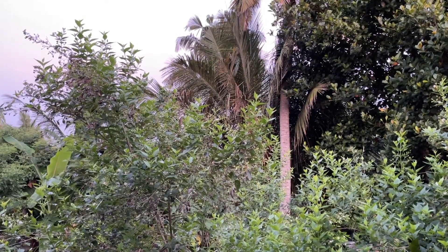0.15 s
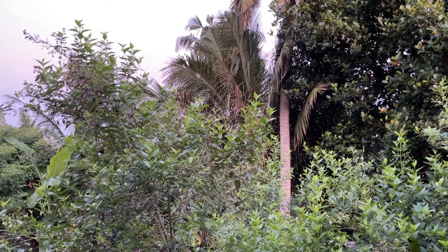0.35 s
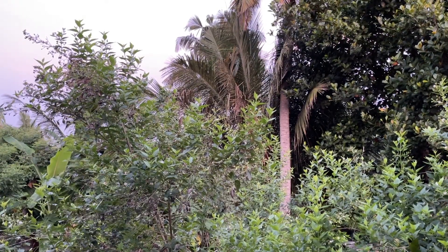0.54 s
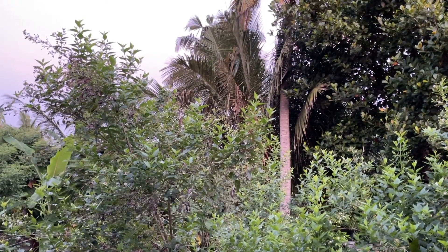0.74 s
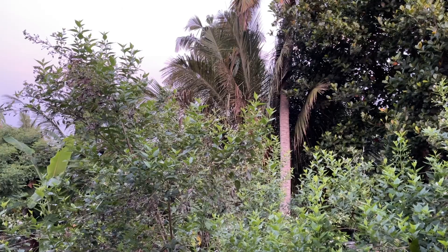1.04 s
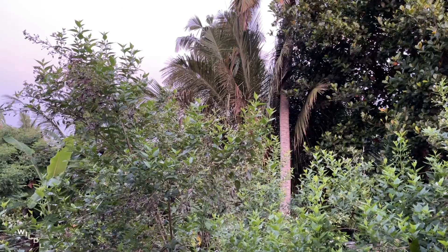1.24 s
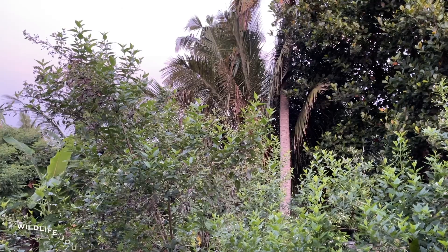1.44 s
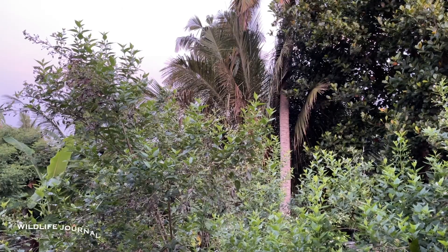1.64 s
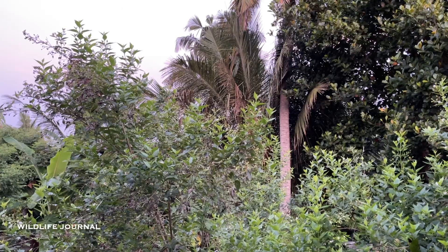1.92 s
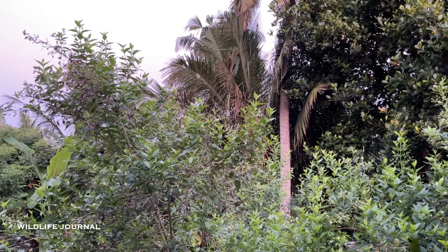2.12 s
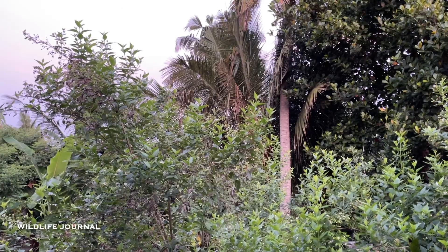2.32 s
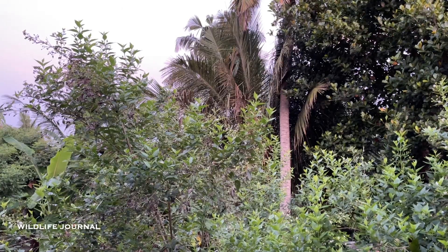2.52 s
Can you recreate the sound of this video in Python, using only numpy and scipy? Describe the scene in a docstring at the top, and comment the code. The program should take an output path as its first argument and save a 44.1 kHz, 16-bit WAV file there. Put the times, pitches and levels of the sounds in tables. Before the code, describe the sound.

Two strong, clear bird whistles rise, then drop with a little rasp, each trailing a long diffuse echo. High thin cicadas, a far insect chorus and soft air rumble continue throughout a leafy garden, heard in wide stereo.

```python
"""A large bird whistles its rising-and-falling call twice among garden trees: a swept sine with overtones and rasp,
convolved with scattered, decaying reflections that form a long echo.
A near cicada buzzes high up beside a fainter one: click-driven narrow-band tones, with a low hum at the click rate.
Behind them lie a far insect chorus, crickets and the rumble of the air, all shaped noise,
and a few far birds, which are short frayed sine notes."""
import sys
import numpy as np
from scipy import signal
from scipy.fft import rfft, irfft, next_fast_len
from scipy.io import wavfile
from scipy.ndimage import uniform_filter1d

SR = 44100
rng = np.random.default_rng(int(sys.argv[2]) if len(sys.argv) > 2 else 0)


def store_wav(level_fs):
    """Save 16-bit WAV to argv[1]."""
    pcm = np.round(np.clip(np.atleast_2d(level_fs), -1, 1) * 32767)
    wavfile.write(sys.argv[1], SR, pcm.T.astype(np.int16))


def gain_from_decibels(decibels):
    """Convert decibel values to linear amplitude factors."""
    exponent = np.asarray(decibels, float) / 20
    return 10 ** exponent


N = 117747  # samples in the scene
LEAD = 11025  # samples computed ahead of time zero, where the first call begins


def evened(x):
    """Normalization: scales a signal to an rms of 1."""
    return x / np.sqrt(np.mean(x ** 2) + 1e-20)


def read(points, hz, column=1):
    """Interpolation of a table column along a logarithmic frequency axis."""
    table = np.transpose(points)
    return np.interp(np.log(hz + 1), np.log(table[0] + 1), table[column])


def coloured(x, spectrum):
    """Linear filtering: weights each frequency by a table of gains in dB."""
    hz = np.fft.rfftfreq(len(x), 1 / SR)
    return irfft(rfft(x) * gain_from_decibels(read(spectrum, hz)), len(x))


def drift(rate_hz, size):
    """Superposition of slow sines in random phase gives an irregular fluctuation of rms 1."""
    t = np.arange(size) / SR
    return evened(sum(np.sin(2 * np.pi * (f * t + rng.random())) / np.sqrt(f)
                      for f in np.geomspace(rate_hz / 10, rate_hz, num=20)))


def ports(pair, table):
    """Interaural-style cues: phase and level differ between left and right, frequency by frequency."""
    size = next_fast_len(pair.shape[1] + 2048)
    hz = np.fft.rfftfreq(size, 1 / SR)
    half = gain_from_decibels(read(table, hz, column=2) / 2) * np.exp(.5j * read(table, hz))
    return irfft(rfft(pair, size) * [half, 1 / half], size)[:, :pair.shape[1]]


def wash(spectrum, table, level_db, patchy_db, swell_db, swell_hz):
    """Many unresolved sources sum to Gaussian noise: random short-time spectra, patchy and swelling."""
    frames, hz = N // 256 + 5, np.fft.rfftfreq(1024, 1 / SR)
    a, b, c, d, patches = rng.standard_normal((frames, 513, 5)).T
    patches = uniform_filter1d(patches, size=8, axis=0)  # smooth along frequency
    patches = evened(uniform_filter1d(patches, size=12, axis=1))  # smooth along time
    swell = drift(swell_hz, frames * 256)[::256]
    # the right channel is a partly coherent copy of the left
    alike = np.clip(read(table, hz), 0, 1)[:, None]
    left = a + 1j * b
    right = alike * left + np.sqrt(1 - alike ** 2) * (c + 1j * d)
    half = (gain_from_decibels(read(table, hz, column=3) / 2) * np.exp(.5j * read(table, hz, column=2)))[:, None]
    z = np.array([left * half, right / half])
    z *= gain_from_decibels(read(spectrum, hz)[:, None] + patchy_db * patches + swell_db * swell)
    out = signal.istft(z, nperseg=1024, noverlap=768)[1][:, :N]
    return gain_from_decibels(level_db) * out / np.sqrt(np.mean(out.mean(0) ** 2))


def air():
    """Broadband noise whose spectral density falls steeply above the bass is heard as rumble."""
    # Rumble spectrum. Each row: frequency in Hz, relative density in dB.
    air_spectrum = [(30, -2.5), (60, -4), (110, 3), (200, -4.5), (330, -8.5), (600, -13.5), (1200, -23),
                    (2400, -36.5), (5000, -46), (6000, -56), (8000, -120)]
    # Stereo field. Each row: frequency in Hz, likeness of the channels (0 to 1), phase in radians,
    # left over right in dB.
    air_ports = [(39.6, .995, 0.36, 3), (85, 1, 0.28, 2.5), (220, 0.86, -1.07, -1), (450, 0.31, -1.09, 4.5),
                 (1580, 0.11, -0.7, 0.5), (2350, 0.4, -0.067, 2), (4600, 0.092, 0.69, -2)]
    return wash(air_spectrum, air_ports, level_db=-54, patchy_db=0.72, swell_db=0.26, swell_hz=3.0)


def crickets():
    """Superposed chirring in a narrow band becomes band noise with a quick common swell."""
    # Cricket band. Each row: frequency in Hz, relative density in dB.
    cricket_spectrum = [(2000, -85), (2500, -12.5), (2750, -4), (2900, 4), (3100, -9.5), (3500, -50)]
    # Stereo field. Each row: frequency in Hz, likeness of the channels (0 to 1), phase in radians,
    # left over right in dB.
    cricket_ports = [(2670, 0.62, 0.87, -7), (3200, 0.36, 0.33, 10.5)]
    return wash(cricket_spectrum, cricket_ports, level_db=-78.5, patchy_db=1, swell_db=2, swell_hz=10)


def insect_chorus():
    """Far insects in several treble bands overlap into one noise-like chorus."""
    # Chorus bands. Each row: frequency in Hz, relative density in dB.
    chorus_spectrum = [(4400, -75), (5200, -38.5), (5700, -10.5), (6100, -4.5), (6500, -8), (6800, -10.5),
                       (7200, -38.5), (7900, -17), (8400, -11.5), (9000, 0), (9900, -14), (10300, -44),
                       (12000, -120)]
    # Stereo field. Each row: frequency in Hz, likeness of the channels (0 to 1), phase in radians,
    # left over right in dB.
    chorus_ports = [(5520, 0.13, 3, -0.5), (6656, 0.4, -0.5, 8.5), (7280, 0.44, -12, -18.5),
                    (8850, 1, -16, 2.5), (8690, 0.44, -0.06, 9), (10800, 0.58, -1, 4.5)]
    return wash(chorus_spectrum, chorus_ports, level_db=-62.5, patchy_db=1.3, swell_db=-0.14, swell_hz=3.7)


def far_birds():
    """Amplitude modulation by noise frays gliding, soft-edged tones on their long way through the leaves."""
    # Short notes. Each row: start in seconds, length in seconds, pitch in Hz, glide over the note in Hz,
    # level at mid-note in dB, fraying share.
    far_notes = [(1.075, .045, 1000, 20, -65, .2), (1.44, .04, 830, -10, -64, .2),
                 (1.425, .055, 4100, -200, -82, 1.5), (1.6, .04, 1045, 10, -67, .2),
                 (2.025, .07, 890, -30, -68, .2)]
    t, out = np.arange(N) / SR, 0
    for start, length, hz, glide_hz, db, fray in far_notes:
        u = np.clip((t - start) / length, 0, 1)  # progress through the note
        shake = 1 + fray * evened(uniform_filter1d(rng.standard_normal(N), size=120))
        tone = np.sin(2 * np.pi * np.cumsum(hz + glide_hz * u) / SR)
        out = out + np.sqrt(2 / (1 + fray ** 2)) * gain_from_decibels(db) * shake * np.sin(np.pi * u) * tone
    return out


def rib_clicks(cycle):
    """Impulsive excitation: each click of the ribs jumps up and decays exponentially."""
    # Clicks in one cycle. Each row: position as a share of the cycle, relative strength in dB.
    ribs = [(0, 12), (0.332, 7.5)]
    decay = .2  # share of a cycle
    return sum(gain_from_decibels(rib_db) * np.exp(-((cycle - at) % 1) / decay) for at, rib_db in ribs)


def body_tone(hz, width_hz):
    """Resonance: a narrow band of noise about its centre frequency is a tone that wavers."""
    r = np.exp(-np.pi * width_hz / SR)
    noise = rng.standard_normal(N) + 1j * rng.standard_normal(N)
    envelope = signal.lfilter([1 - r], [1, -r], noise)
    return evened((envelope * np.exp(2j * np.pi * hz * np.arange(N) / SR)).real)


def cicada():
    """Rib clicks modulate the body tones of two cicadas; a low hum lies on the nearer one's rate."""
    # Rate of the nearer cicada. Each row: time in seconds, cycles per second.
    buzz_rate = [(0, 132.5), (.6, 132.5), (1.15, 131.1), (1.65, 131.7), (1.85, 131), (2.0, 126), (2.3, 127),
                 (2.67, 130.5)]
    # Body tones. Each row: rate factor (1 or the second cicada's), frequency in Hz, width in Hz,
    # relative strength in dB.
    bodies = [(1, 9340, 35, 2), (1, 9655, 60, -3), (.95, 8955, 30, -1), (.95, 8620, 200, -13)]
    # Colour of the buzz. Each row: frequency in Hz, gain in dB.
    buzz_colour = [(7500, -30), (8400, -3), (8900, -4.5), (9700, 3.5), (9850, -18.5), (10300, -31)]
    # Buzz at the two microphone ports. Each row: frequency in Hz, lead of the left in radians,
    # left over right in dB.
    buzz_ports = [(8500, -27, -8), (7910, 0, -12.5), (9940, -3, 0), (9706, 1.5, 13)]
    # Hum partials. Each row: multiple of the buzz rate, middle level in dB.
    hum_partials = [(1, -65.5), (2, -66.5), (3, -69.5)]
    hum_waver_db, buzz_db = 4, -58.5
    s, rate = np.transpose(buzz_rate)
    cycle = np.cumsum(np.interp(np.arange(N) / SR, s, rate)) / SR
    buzz = 0
    for factor, hz, width_hz, body_db in bodies:
        buzz = buzz + gain_from_decibels(body_db) * rib_clicks(factor * cycle) * body_tone(hz, width_hz)
    buzz = evened(coloured(buzz, buzz_colour)) * gain_from_decibels(buzz_db)
    hum = 0
    for k, hum_db in hum_partials:
        level = gain_from_decibels(hum_db + hum_waver_db * drift(25, N))
        hum = hum + np.sqrt(2) * level * np.sin(2 * np.pi * k * cycle)
    return ports(np.array([buzz, buzz]), buzz_ports) + hum


def trees(x):
    """Diffuse reverberation: scattered reflections build up, then decay at a rate set by frequency."""
    # Echo decay. Each row: frequency in Hz, time to fall 60 dB in seconds, relative strength in dB.
    echo_t60 = [(830, 1.77, 1.5), (1290, 1.03, 5), (1590, 1.32, 0.5), (2870, 0.8, 3.5), (5900, 0.99, 5.5),
                (10950, 0.25, 2.5)]
    alike, build_s = 0.42, 0.0049  # likeness of left and right; time constant of the onset
    near_db, near_t60 = 6, 0.5  # extra strength and decay (s) of the nearest trees
    lumpy_db = 4.5  # unevenness of the tail, rms
    leaves_hz = 1.1  # moving foliage keeps changing the paths
    # three sets of paths, each with one impulse of random sign in every 20 samples
    taps = np.zeros((3, 2, 60000))
    at = np.arange(100, 59980, 20) + rng.integers(0, 20, (3, 2, 2994))
    np.put_along_axis(taps, at, rng.choice([-1., 1.], at.shape), 2)
    taps[:, 1] = alike * taps[:, 0] + np.sqrt(1 - alike ** 2) * taps[:, 1]
    hz, t, z = signal.stft(taps, SR, nperseg=256)
    fall_db = 60 * t / read(echo_t60, hz)[:, None]
    shape = gain_from_decibels(read(echo_t60, hz, column=2)[:, None] - fall_db) * (1 - np.exp(-t / build_s))
    lumps = evened(uniform_filter1d(rng.standard_normal(len(t)), size=4))
    shape *= (1 + gain_from_decibels(near_db - 60 * t / near_t60)) * gain_from_decibels(lumpy_db * lumps)
    tail = signal.istft(z * shape, SR, nperseg=256)[1]
    tail = tail / np.linalg.norm(tail[0, 0])
    # the sets take turns at constant total power
    turn = np.pi * (leaves_hz * np.arange(len(x)) / SR + np.arange(3)[:, None] / 3)
    fed = np.sqrt(2 / 3) * np.cos(turn) * x
    return signal.fftconvolve(fed[:, None], tail, axes=2).sum(0)[:, :len(x)]


def overtones(hz, turns):
    """Source-filter principle: the throat and beak weigh each harmonic by its frequency."""
    # Overtone strength. Each row: frequency in Hz, strength in dB.
    throat = [(1700, -60), (2700, -29), (3200, -27.5), (4100, -43.5), (4800, -47), (5330, -22), (5500, -25),
              (5680, -44), (6250, -34), (6800, -30.5), (7900, -30.5), (9300, -49), (10000, -54),
              (11050, -72), (11450, -27), (11750, -47), (12050, -34.5), (12500, -52)]
    return sum(gain_from_decibels(read(throat, k * hz)) * np.sin(k * turns) * (k * hz < 13000) for k in range(2, 12))


def rasp_sound(hz, turns, flutter):
    """Subharmonics at multiples of a quarter of the pitch, mixed with noise, are heard as roughness."""
    # Colour of the rasp. Each row: frequency in Hz, gain in dB.
    rasp_colour = [(1200, -3), (1900, 9), (2400, -2), (3000, -1.5), (3550, -17.5), (4600, -13),
                   (6200, -10.5), (8000, 1.5), (10000, -20), (11200, 9.5), (11900, -8), (12300, -41)]
    locked = .72  # share of the rasp that locks to every fourth cycle of the whistle
    strands = sum(np.cos(k * turns / 4 + k ** 2) * (k * hz / 4 < 13000) for k in range(3, 60))
    rasp = locked * evened(strands) * flutter + (1 - locked) * rng.standard_normal(len(hz))
    return evened(coloured(rasp, rasp_colour))


def call(start, effort_db):
    """Frequency modulation: a nearly pure whistle follows the tune, with thin overtones and passing rasp."""
    # One call. Each row: time after its start in seconds, pitch in Hz, level in dB relative to the effort,
    # overtone gain in dB, rasp in dB relative to the level.
    tune = [(0, 1299, -15.5, -29, -48), (.015, 1435, -10.5, 7.5, -60), (.06, 1375, -5.5, -6, -22),
            (0.113, 1325, -6, -2.5, -56), (.215, 1347, -7, 1.5, -70), (.27, 1445, 2, -9, -80),
            (.325, 1574, -6, -2.5, -14), (.375, 1568, -3, 0.5, -14), (.405, 1334, -11, 2, -12),
            (0.465, 934.6, -20.5, -30, -15), (0.499, 839, -26, -29, -46), (0.532, 864, -60, -34, -22)]
    waver_hz, flutter_hz = 3.22, 90  # rms wander of the pitch; upper limit of the strength flutter
    overtone_shake = .22  # share of flutter in the overtones and locked rasp
    t = np.arange(-LEAD, N) / SR - start
    s, hz, db, over_db, rasp_db = np.transpose(tune)
    hz = uniform_filter1d(np.interp(t, s, hz), size=500) + waver_hz * drift(40, len(t))
    level = gain_from_decibels(effort_db + uniform_filter1d(np.interp(t, s, db, -120, -120), size=300))
    rasp_level = gain_from_decibels(np.interp(t, s, rasp_db))
    turns = 2 * np.pi * np.cumsum(hz) / SR  # phase
    low_pass = signal.butter(N=2, Wn=flutter_hz, fs=SR)
    shake = evened(signal.lfilter(*low_pass, rng.standard_normal(len(t))))
    flutter = 1 + overtone_shake * shake
    whistle = (1 + rasp_level * shake) * np.sin(turns)  # the rasp also shakes the whistle's strength
    voice = whistle + gain_from_decibels(np.interp(t, s, over_db)) * flutter * overtones(hz, turns)
    return level * (np.sqrt(2) * voice + rasp_level * rasp_sound(hz, turns, flutter))


def bird():
    """Superposition of direct sound and reverberation: both calls, each with its echo."""
    # Calls. Each row: start in seconds, effort in dB.
    calls_at = [(-.165, -38.5), (1.974, -38)]
    # The bird at the two microphone ports. Each row: frequency in Hz, lead of the left in radians,
    # left over right in dB.
    bird_ports = [(900, 2.5, 1), (1330, 2.8, 3.5), (1570, 3.2, -2), (2800, 1, 1), (5350, .3, 9),
                  (8000, .5, 2), (11200, 1.3, 0)]
    echo_db = 4
    direct = sum(call(*row) for row in calls_at)
    return ports(direct + gain_from_decibels(echo_db) * trees(direct), bird_ports)[:, LEAD:]


def scene():
    """Linear superposition of air, crickets, far chorus, far birds, cicadas and the calling bird."""
    return air() + crickets() + insect_chorus() + far_birds() + cicada() + bird()


def band_limit(x):
    """A steep low-pass at the top of the band."""
    return signal.sosfilt(signal.butter(12, 12620, fs=SR, output="sos"), x)


def record(dry):
    """Band limitation: a high-pass at 42 Hz and a steep low-pass at 12500 Hz bound the spectrum."""
    low_cut = signal.butter(N=4, Wn=42, btype="high", fs=SR, output="sos")
    cut = signal.sosfilt(low_cut, dry)
    edge = signal.firwin(511, 12500, window=("kaiser", 9), fs=SR)
    mix = signal.oaconvolve(cut, edge[None], "same")
    return band_limit(mix)


dry = scene()
out = record(dry)
store_wav(out)
```